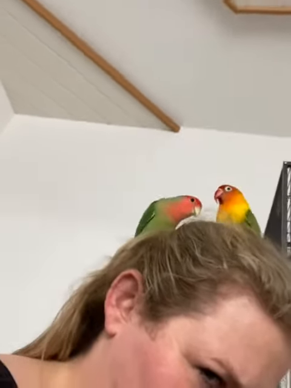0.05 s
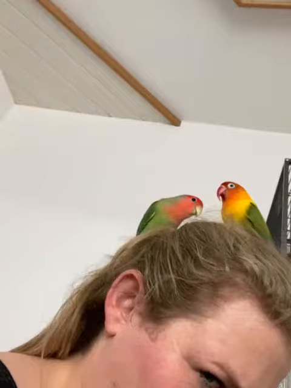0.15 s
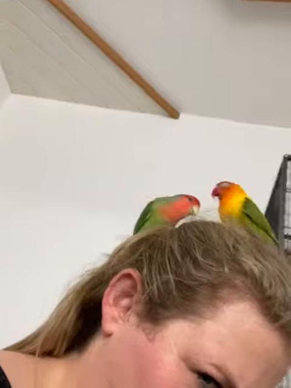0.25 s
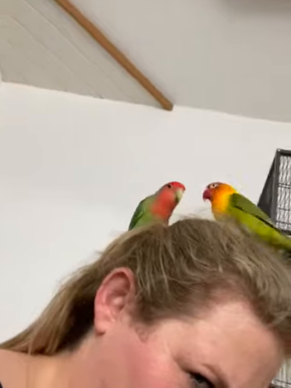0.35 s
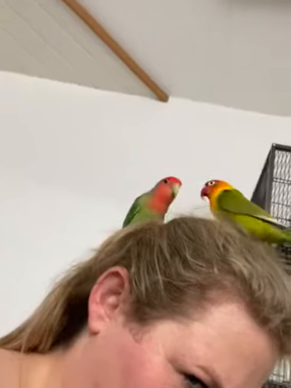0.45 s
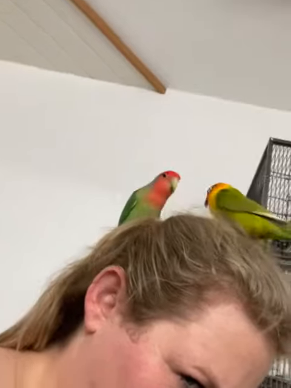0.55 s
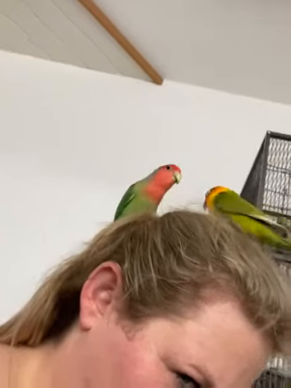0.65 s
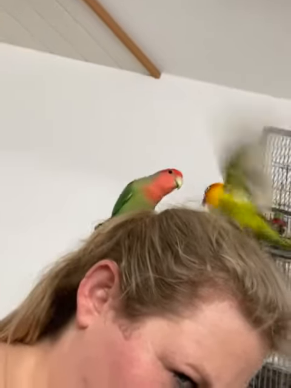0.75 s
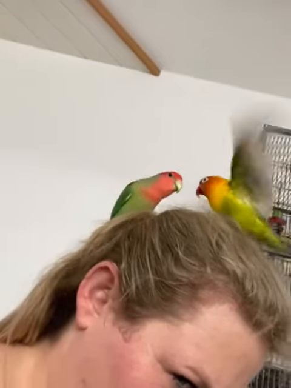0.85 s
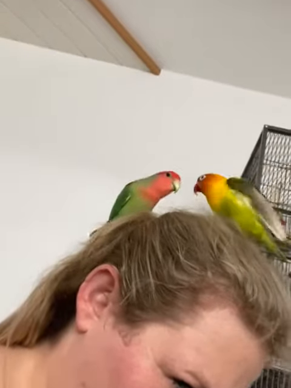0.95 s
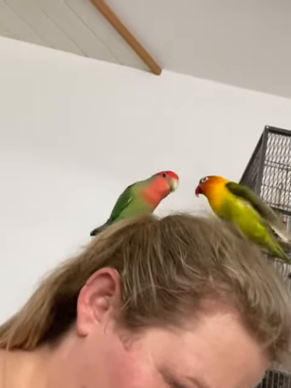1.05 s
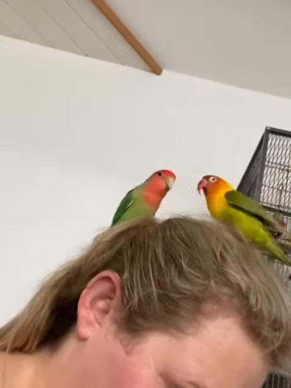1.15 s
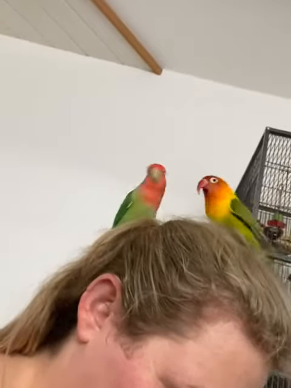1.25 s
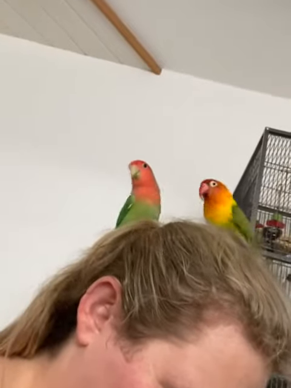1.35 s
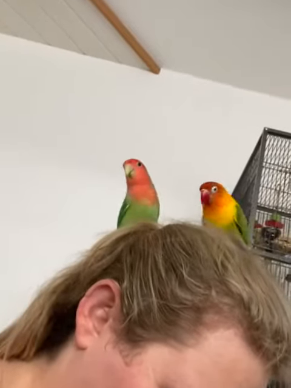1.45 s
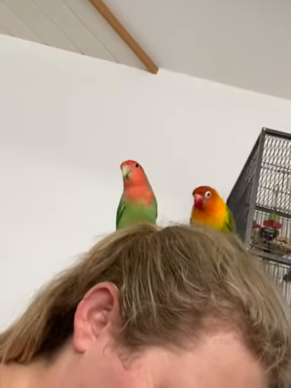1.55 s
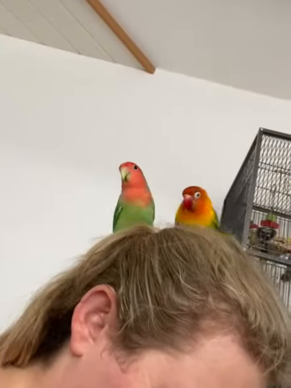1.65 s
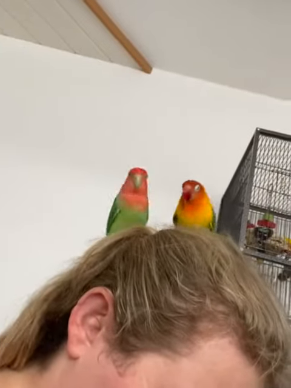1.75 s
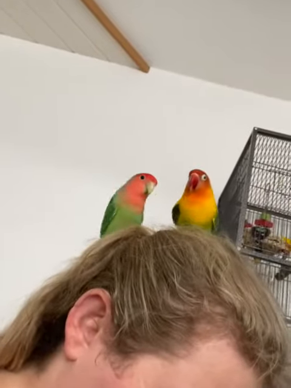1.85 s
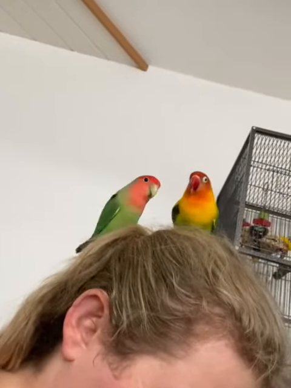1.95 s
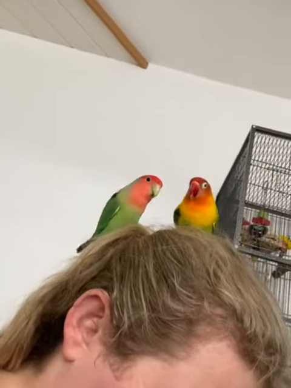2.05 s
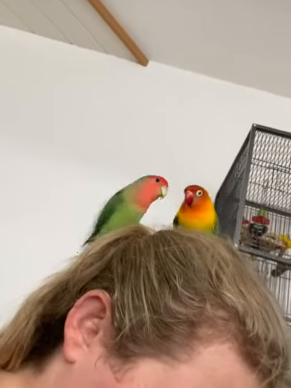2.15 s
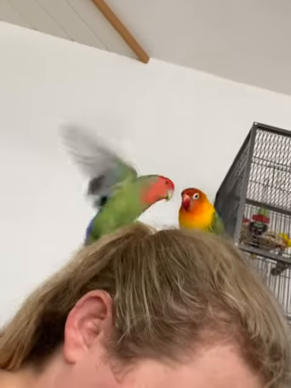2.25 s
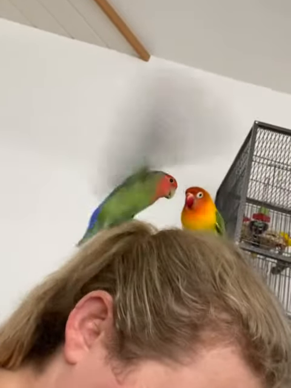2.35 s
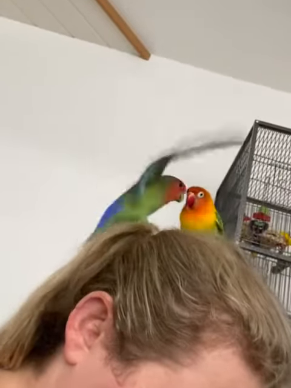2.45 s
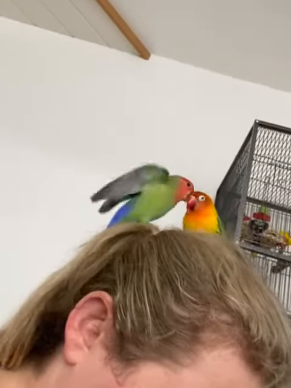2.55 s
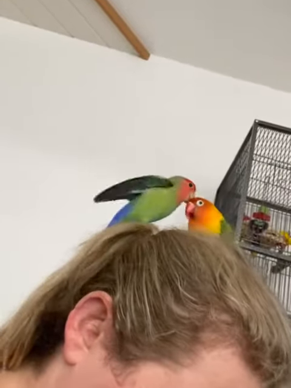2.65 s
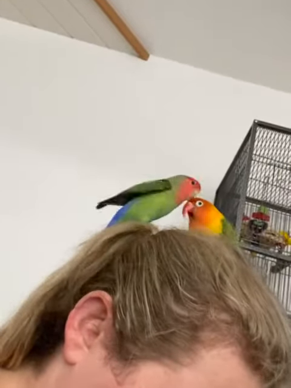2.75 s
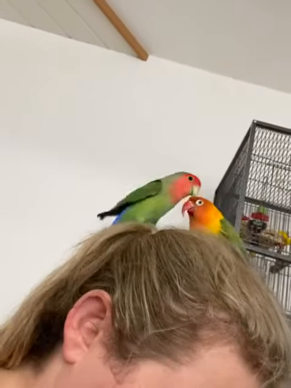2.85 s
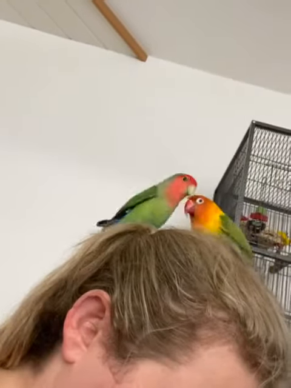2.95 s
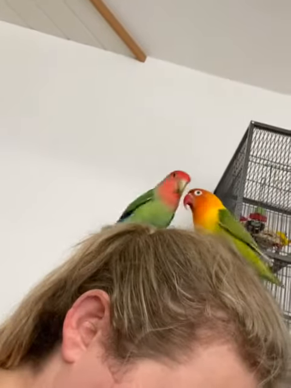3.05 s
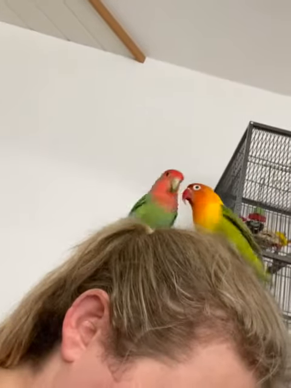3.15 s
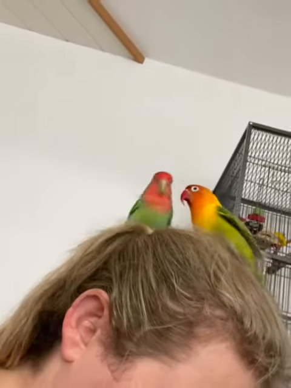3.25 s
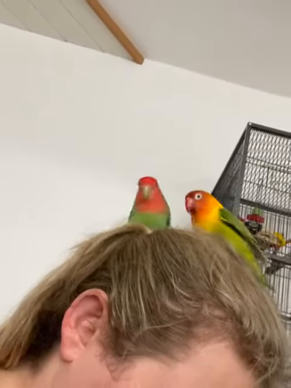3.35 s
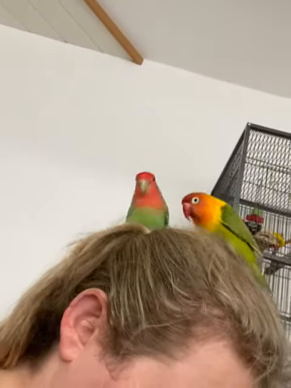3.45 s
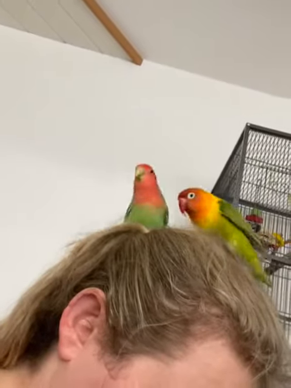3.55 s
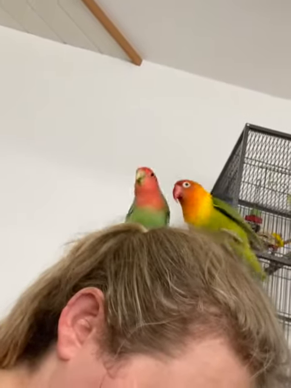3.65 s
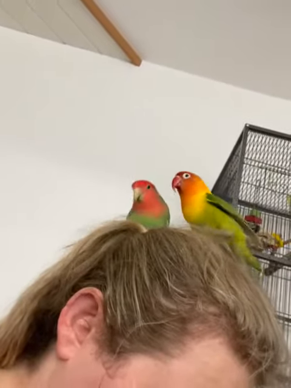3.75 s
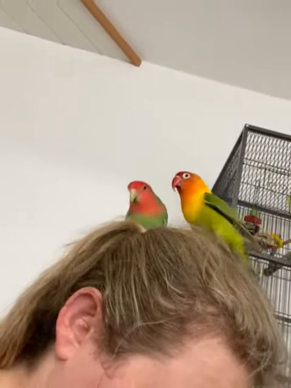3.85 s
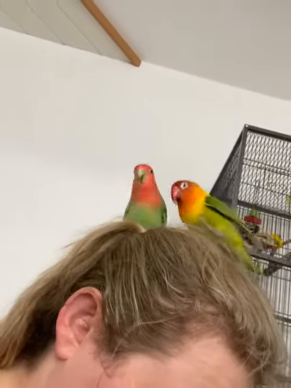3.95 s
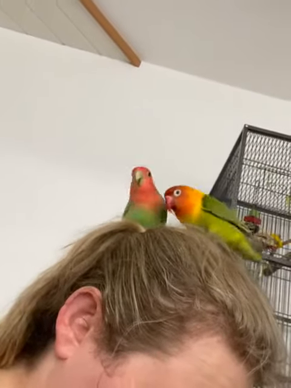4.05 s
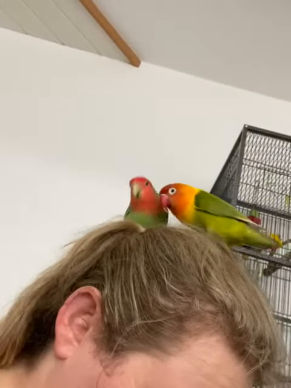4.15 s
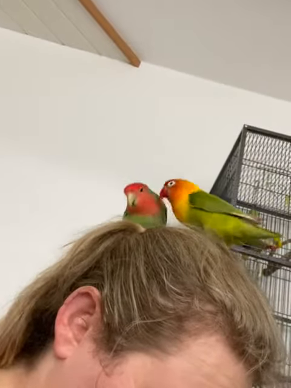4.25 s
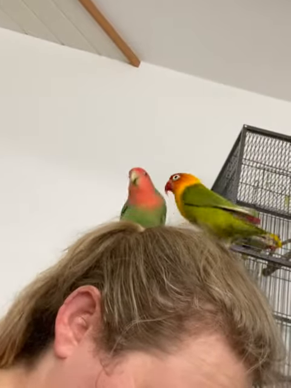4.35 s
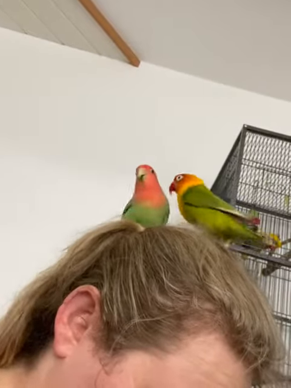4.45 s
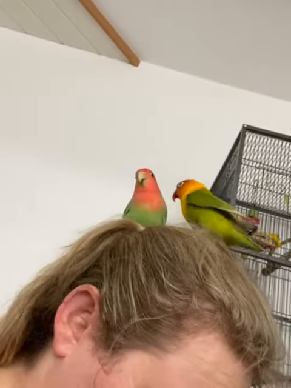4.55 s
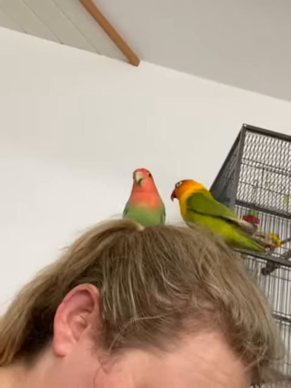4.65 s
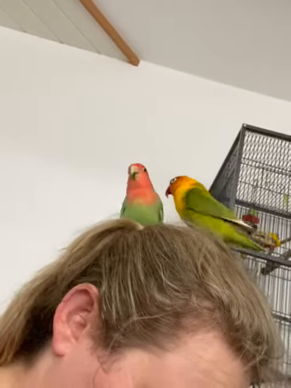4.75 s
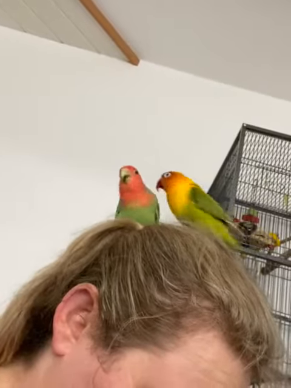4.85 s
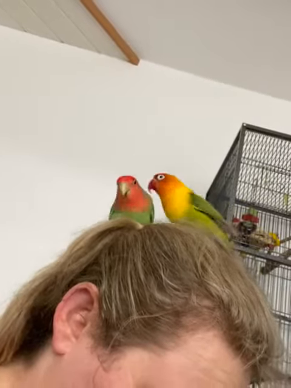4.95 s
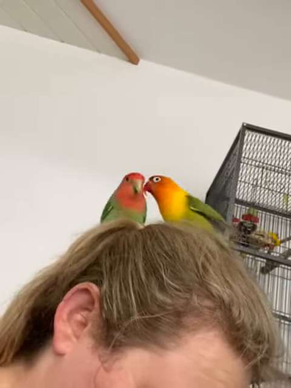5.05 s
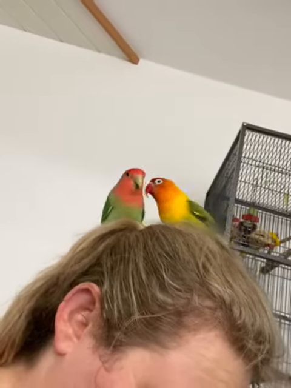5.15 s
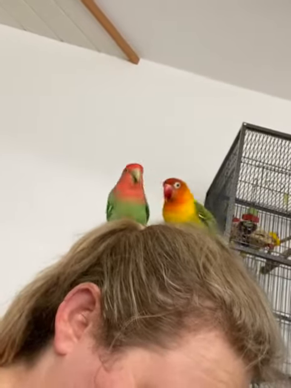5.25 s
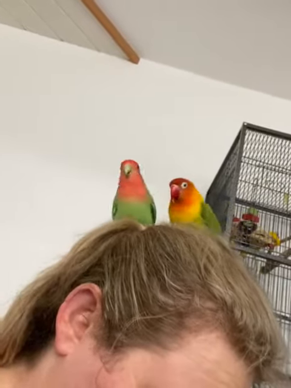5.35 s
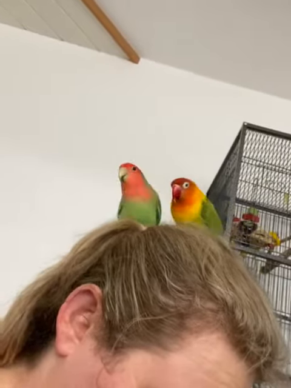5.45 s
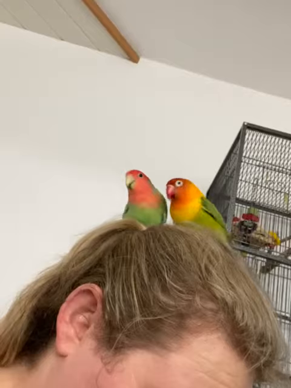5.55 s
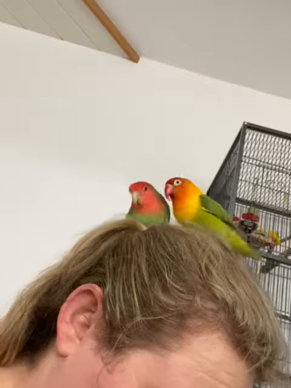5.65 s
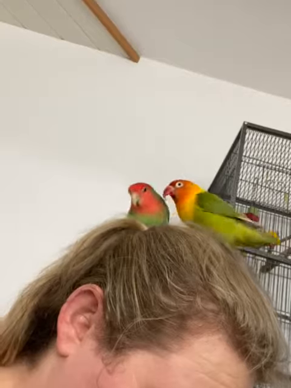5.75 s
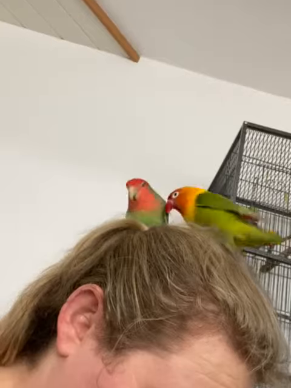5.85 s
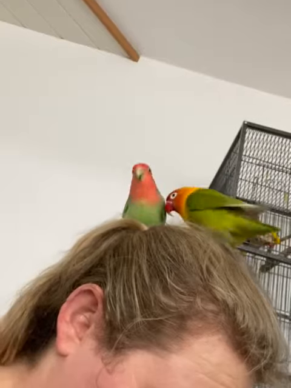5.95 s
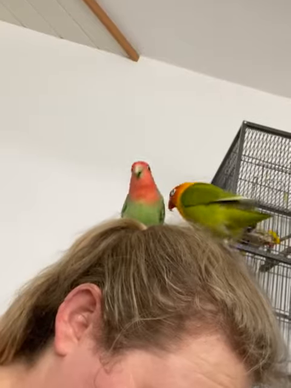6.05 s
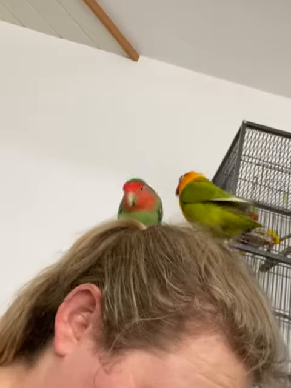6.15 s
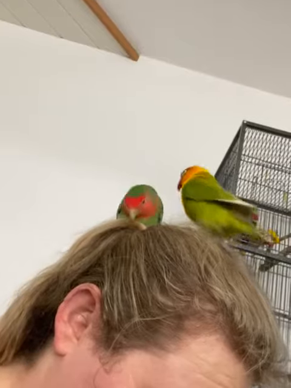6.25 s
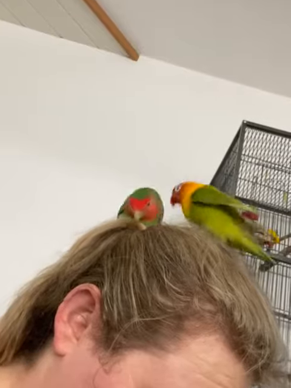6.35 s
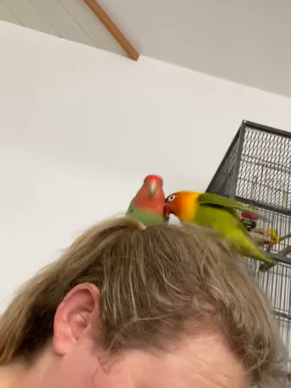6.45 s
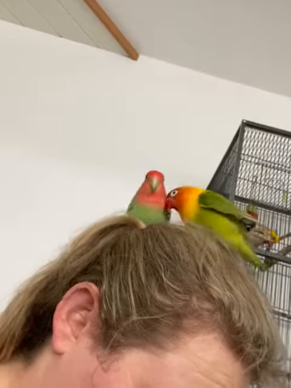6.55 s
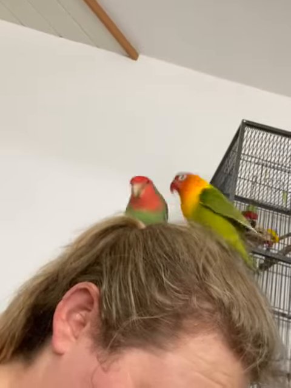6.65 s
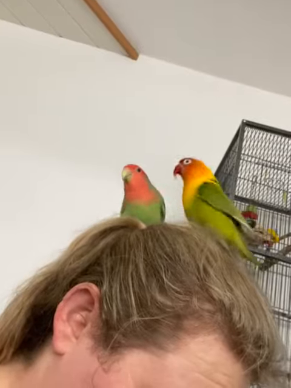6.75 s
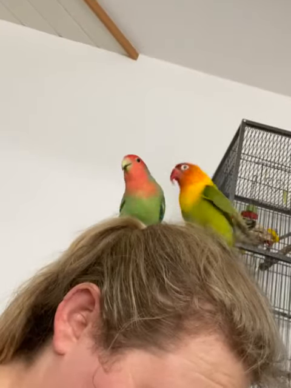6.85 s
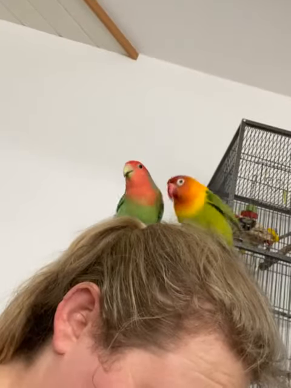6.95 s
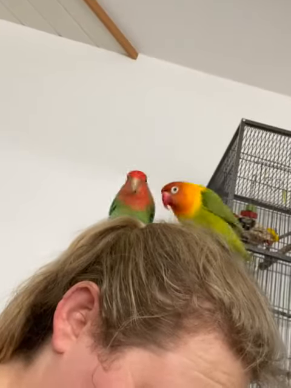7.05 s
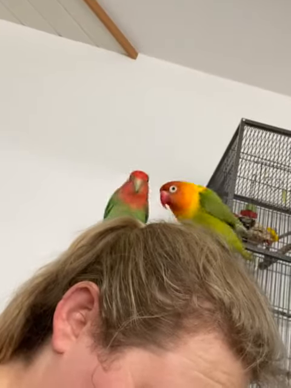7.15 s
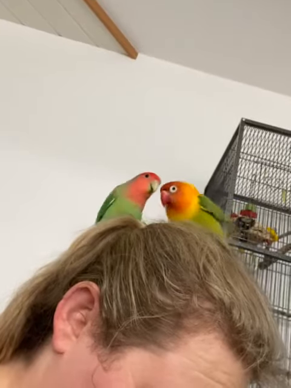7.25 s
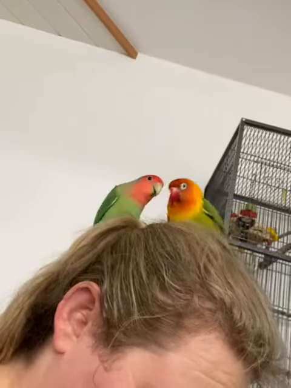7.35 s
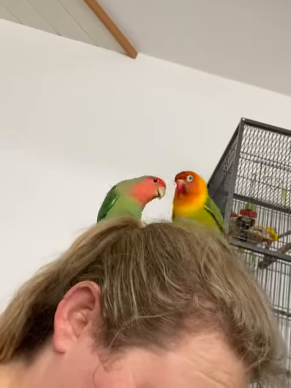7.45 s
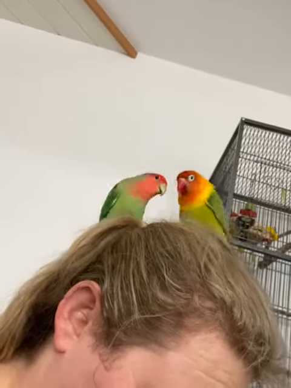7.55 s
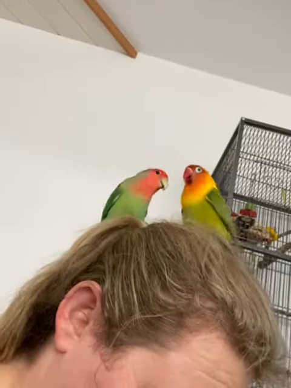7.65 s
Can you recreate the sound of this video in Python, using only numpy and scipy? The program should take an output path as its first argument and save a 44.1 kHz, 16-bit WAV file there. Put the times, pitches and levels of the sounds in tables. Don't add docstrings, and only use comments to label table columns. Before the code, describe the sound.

Sharp, split-second lovebird chirps ring off bare walls, separated by quiet dry beak ticks, a brief feathery flap and faint appliance hum.

```python
import sys
import numpy as np
from scipy import signal
from scipy.fft import rfft, irfft
from scipy.io import wavfile
from scipy.ndimage import uniform_filter1d

SR = 44100
rng = np.random.default_rng(int(sys.argv[2]) if len(sys.argv) > 2 else 0)


def dump(signal):
    limited = np.clip(np.atleast_2d(signal).T, -1, 1)
    pcm = np.round(limited * 32767).astype(np.int16)
    wavfile.write(sys.argv[1], SR, pcm)


def voltage_ratio(level):
    return 10 ** (np.asarray(level, float) / 20)


N = 339109

# time in seconds, pitch in Hz, effort in dB, beak resonance in dB.
HELD_NOTES = [
    [(.9272, 2220, -11, 1), (.9328, 2170, -11, 1), (.9368, 2250, -4, -1), (.941, 2130, -1, 0),
     (.9445, 2160, 0, 2), (.9464, 2190, -2, 3), (.9494, 2290, -6, 7), (.9566, 2410, -8, 10),
     (.9592, 2300, -8, 0)],
    [(2.4279, 2480, 1, 0), (2.4325, 2530, 1, -1), (2.435, 2390, -5, -3), (2.4445, 2360, -3, -6),
     (2.447, 2490, -3, -2), (2.46, 2470, -3, -3), (2.4625, 2290, -4, 3), (2.4688, 2620, -4, 4)],
]
# time in seconds, soft lead-in in ms, length in ms, pitch in Hz, effort in dB.
PIPS = [
    (.9148, .1, 1.8, 2220, -8),
    (.9205, .1, 2.2, 2200, -24),
    (.9247, .1, 1.2, 2250, -19),
    (2.4217, .8, 1.3, 2400, -6),
    (5.4446, 1.1, 1.7, 2390, -12),
]
# time of the top in seconds, jump in Hz, fall in ms, effort surge in dB.
FLICKS = [
    (.9288, 420, 2, 11),
    (.939, 350, 1.7, 5),
    (2.4364, 420, 2.4, 7),
    (2.446, 380, 1.7, 4),
    (2.4521, 1050, 1.4, 7.5),
]
# time in seconds, length in ms, drop in Hz, sag in Hz per ms.
REGISTER_SLIP = (2.4566, 3.2, 300, 45)
# valid from in seconds, half steps in pitch jumps in dB, steady half steps in dB,
# hoarseness in dB, onset puff in dB, share sent to the room in dB.
CHIRP_CHARACTER = [
    (0, -32, -29.5, -37, -13.5, -1.5),
    (2, -21, -30.5, -22, -25, -1.1),
    (5, -42, -37, -49, -9, -4),
]
OVERTONE_PUSH = [.5, 1, 1, .85, 2.1]
# frequency in Hz, gain in dB.
WINDPIPE = [(1500, -62), (2060, -38), (2160, -18), (2700, -18), (3300, -15), (4400, -11), (5300, -6),
            (6400, -13), (7000, -11), (7600, -17), (8300, -30), (8900, -24), (10500, -29), (11200, -20),
            (12100, -34), (12700, -70)]
# frequency in Hz, density in dB per Hz.
PUFF_SPECTRUM = [(500, -27.5), (1200, -6), (3500, -3.5), (5500, -0.7), (8000, -9.5), (11000, -10),
                 (12500, -35.5)]

# knock in Hz, hollow note in dB.
DEEP_BEAK = (1240, -14)
MIDDLE_BEAK = (1580, -15)
THIN_BEAK = (1950, -22)
# time in seconds, peak in dB, snap in dB.
DEEP_TICKS = [(.0755, -44.5, -11.5), (.169, -45, -12), (.248, -40.5, -13), (.465, -39, -22.5),
              (.529, -42.5, -13.5), (.553, -41, -16), (.645, -40.5, -11.5), (.735, -44.5, -18.5),
              (1.637, -38.5, -19), (1.833, -37.5, -16.5), (1.994, -55.5, -2), (2.135, -42, -20),
              (3.71, -48.5, -27), (3.816, -38, -20), (4.519, -45, -32), (7.14, -42, -6), (7.23, -39.5, -15)]
THIN_TICKS = [(.374, -45.5, -6), (.9025, -36, -16), (1.541, -40.5, -25), (5.559, -61, -8.5),
              (6.427, -51.5, -15), (6.92, -59.5, -4), (7.268, -57, -2), (3.2135, -51, -3)]
LOOSE_TICKS = [(.072, -42.5, -28), (.181, -43.5, -1.5), (.26, -37, -18), (.635, -46, -10),
               (.825, -47.5, -30), (1.2565, -53, -10.5), (1.371, -39.5, -10), (1.485, -45, -25),
               (1.611, -40, -8.5), (1.735, -38, -15), (1.875, -41, -13.5), (2.255, -40.5, -16.5),
               (6.064, -50, -21.5), (6.184, -45, -38), (6.299, -41, -24), (6.537, -52.5, -17),
               (7.028, -40.5, -17), (7.114, -39.5, -12), (7.328, -44.5, -9.5)]
GRINDING_TICKS = [(2.705, -47.5, -14), (2.861, -44.5, -7), (2.977, -48.5, -20), (3.095, -42, -19.5),
                  (3.208, -47, -5.5), (3.332, -44, -9), (3.453, -41, -16), (3.559, -43.5, -10),
                  (3.679, -38.5, -11), (3.79, -47, -11), (3.914, -43.5, -15), (4.034, -39.5, -15),
                  (4.128, -38.5, -15), (4.149, -42.5, -7.5), (4.262, -45, -24.5), (4.38, -49, -10),
                  (4.552, -39, -13), (4.644, -37, -23), (4.735, -43.5, -14), (5.124, -50, -15),
                  (5.246, -47, -12), (5.354, -41, -16), (5.463, -39.5, -19), (5.583, -44, -20)]

# start in seconds, length in seconds, level in dB, brightness in dB per octave.
WING_STROKES = [
    (0.784, 0.064, -62.5, 2),
    (0.878, 0.051, -61, 1),
    (2.246, 0.056, -53.5, 2.5),
    (2.3388, .007, -47, -1),
    (2.343, 0.027, -47.5, -0.5),
    (5.826, .007, -72, 6),
    (1.996, 0.0071, -62.5, 4),
    (2.371, 0.032, -57, -3),
    (2.403, 0.021, -44, -0.5),
]
# frequency in Hz, density in dB per Hz.
FEATHER_SPECTRUM = [(88, -32), (150, -2.5), (664, -2.5), (1650, -6), (2680, -4.5), (3280, -7), (7720, -8),
                    (11400, -15.5), (12800, -44.5), (16600, -71), (22000, -120)]
# start in seconds, length in seconds, level in dB, centre in Hz.
SCRATCHES = [
    (7.3, .03, -72, 7200),
    (7.385, .025, -70, 5500),
    (7.435, .045, -71, 3500),
    (7.54, .07, -70, 2900),
    (.01, .065, -71, 2900),
]
# time of the top in seconds, half width in seconds, level in dB, air frequency factor.
WING_BEATS = [
    (0.469, 0.041, -67, 1.64),
    (0.584, 0.051, -61, 1.5),
    (0.702, 0.044, -67.5, 2.1),
    (2.305, .022, -54, 0.44),
    (2.385, 0.032, -52, .72),
    (2.465, 0.037, -55, .72),
]
# frequency in Hz, density in dB per Hz.
AIR_SPECTRUM = [(30, -18.5), (55, 0.6), (90, 6), (150, 1.5), (300, -13), (600, -30)]

# delay in ms, level in dB.
WALL_ECHOES = [(3.1, -27), (8.2, -16.5), (10.1, -20.5), (13.2, -16.5), (16.5, -24), (20.5, -20),
               (24.5, -19.5)]
# frequency in Hz, time to fall 60 dB in seconds.
WALL_DECAY = [(300, 0.43), (1500, 0.48), (2500, 0.6), (5000, 0.53), (8000, 0.52), (11000, .38)]
# frequency in Hz, density in dB per Hz.
HUM_SPECTRUM = [(15, -54), (25, -25.5), (48, -4.5), (207, -5.5), (255, -8), (283, -7.5), (557, -12.5),
                (915, -13), (1160, -17.5), (1430, -19.5), (2220, -21), (2740, -21.5), (7970, -24),
                (11500, -32.5), (12800, -50), (16600, -80), (22000, -120)]
# centre in Hz, width in Hz, level in dB.
PIPE_DRONE = (890, 110, -82)


def evened(x):
    return x / np.sqrt(np.mean(x ** 2) + 1e-20)


def read(points, hz):
    f, value = np.transpose(points)
    return np.interp(np.log(hz + 1), np.log(f + 1), value)


def add(mix, start_s, sound):
    part = mix[round(start_s * SR):][:len(sound)]
    part += sound[:len(part)]


def coloured(size, points, tilt_db=0):
    hz = np.fft.rfftfreq(size, 1 / SR)
    inside = (hz > .5 * points[0][0]) & (hz < points[-1][0])
    gain = voltage_ratio(read(points, hz) + tilt_db * np.log2((hz + 1) / 3000)) * inside
    return evened(irfft(rfft(rng.standard_normal(size)) * gain, size))


def chirp(curve, half_db, steady_db, breath_db, puff_db):
    edge_ms, ring_ms, jitter = .75, .6, .006
    start_s, end_s = curve[0][0], curve[-1][0]
    t = np.arange(start_s - .002, end_s + .015, 1 / SR)
    smooth = max(round(edge_ms * SR / 1000), 1)
    keep = np.exp(-1000 / SR / ring_ms)

    hz, effort_db, beak_db = controls(curve, t)
    hz = uniform_filter1d(hz, size=12)
    wander = evened(uniform_filter1d(rng.standard_normal(len(t)), size=30))
    hz = hz * (1 + jitter * wander)
    turns = np.cumsum(hz) / SR

    voice = voltage_ratio(breath_db) * coloured(len(t), WINDPIPE) * voltage_ratio(effort_db)
    beak_db = uniform_filter1d(beak_db, smooth)
    for k in range(1, 6):
        push_db = effort_db * OVERTONE_PUSH[k - 1]
        push = uniform_filter1d(voltage_ratio(push_db), smooth)
        resonance_db = beak_db * np.exp(-((k * hz - 7100) / 1100) ** 2)
        throat = voltage_ratio(read(WINDPIPE, k * hz) + resonance_db)
        voice += push * throat * np.sin(2 * np.pi * k * turns)

    sounding = ((t >= start_s) & (t < end_s)) * 1.
    gate = signal.lfilter([1 - keep], [1, -keep], uniform_filter1d(sounding, smooth // 2))
    opening = np.maximum(np.gradient(gate), 0)
    setting_in = signal.lfilter([1], [1, -.965], opening)
    jumps = np.minimum(abs(np.gradient(hz)) / 5, 6)
    uneven = voltage_ratio(steady_db) + voltage_ratio(half_db) * jumps + 0.72 * setting_in
    voice *= 1 + np.minimum(uneven, .9) * np.cos(np.pi * turns)

    puff = voltage_ratio(puff_db + effort_db) * opening * 20 * coloured(len(t), PUFF_SPECTRUM)
    voice = voice * gate ** .7
    high_pass = signal.butter(8, .86 * curve[0][1], "high", fs=SR, output="sos")
    above = signal.sosfilt(high_pass, voice)
    return t[0], signal.lfilter(*signal.iirnotch(8400, 16, SR), above + puff)


def controls(curve, t):
    rise_ms, surge_lag_ms, surge_ms = 1.35, .7, 1.7
    slip_s, slip_ms, drop_hz, sag_hz_per_ms = REGISTER_SLIP
    slip_effort_db, slip_beak_db = 3, -11.5
    s, *columns = np.transpose(curve)
    hz, effort_db, beak_db = (np.interp(t, s, c) for c in columns)
    for top_s, jump_hz, fall_ms, surge_db in FLICKS:
        ms = 1000 * (t - top_s)
        rise, fall = np.maximum(1 + ms / rise_ms, 0), np.exp(-abs(ms) / fall_ms)
        hz = hz + jump_hz * np.where(ms < 0, rise, fall)
        effort_db = effort_db + surge_db * np.exp(-((ms - surge_lag_ms) / surge_ms) ** 2)
    ms = 1000 * (t - slip_s)
    low = (ms > 0) & (ms < slip_ms)
    hz = hz - low * (drop_hz + sag_hz_per_ms * ms)
    return hz, effort_db + low * slip_effort_db, beak_db + low * slip_beak_db


def pip(s, lead_ms, length_ms, hz, effort_db):
    lead_db, sag_hz_per_ms, beak_db = effort_db - 14, 35, -2.5
    return [(s - lead_ms / 1000, hz, lead_db, beak_db),
            (s - 1 / SR, hz, lead_db, beak_db),
            (s, hz, effort_db, beak_db),
            (s + length_ms / 1000, hz - sag_hz_per_ms * length_ms, effort_db, beak_db)]


def tick(row, voicing, chance):
    snap_hz, hollow_hz, knock_spread, hollow_spread_db = 4200, 480, 0.11, 4.5
    s, peak_db, snap_db = row
    knock_hz = voicing[0] * (1 + knock_spread * (chance[5] - .5))
    hollow_db = voicing[1] + hollow_spread_db * (chance[6] - .5)
    t = np.arange(500) / SR

    from_snap = t - .0002
    snap_s = .0001 + .00012 * chance[1]
    snap = np.sin(2 * np.pi * snap_hz * (.8 + .55 * chance[0]) * from_snap) * np.exp(-(from_snap / snap_s) ** 2)

    late = np.maximum(t - .00018, 0)
    knock_decay = voltage_ratio(-60 * late / (.004 + .0025 * chance[1]))
    knock = np.sin(2 * np.pi * knock_hz * late + 2.6) * np.tanh(late / .00005) * knock_decay
    skull = np.sin(2 * np.pi * 970 * late) * voltage_ratio(-60 * late / .015)
    knock += .2 * skull * chance[4]

    turns = hollow_hz * (.8 + .25 * chance[2]) * (late + .0018 * (1 - np.exp(-late / .0005)))
    hollow_decay = voltage_ratio(-60 * late / (.006 + .004 * chance[3]))
    hollow = -np.sin(2 * np.pi * turns) * hollow_decay * (1 - np.exp(-late / .0003))

    sound = voltage_ratio(snap_db + 9.5) * snap + voltage_ratio(-2.5) * knock + voltage_ratio(hollow_db + 12) * hollow
    return s + .0009, voltage_ratio(peak_db) * signal.lfilter(*signal.butter(2, 7500, fs=SR), sound)


def stroke(s, length_s, db, tilt_db):
    grain_db = 4
    swish = coloured(8192, FEATHER_SPECTRUM, tilt_db)
    grain = voltage_ratio(grain_db * evened(uniform_filter1d(rng.standard_normal(8192), 120)))
    size = min(round(length_s * SR), 8192)
    return s, voltage_ratio(db) * evened(swish * grain)[:size] * signal.windows.tukey(size, .5)


def scratch(s, length_s, db, hz):
    band = coloured(4096, [(.6 * hz, -24), (.85 * hz, -3), (1.15 * hz, -3), (1.6 * hz, -24)])
    size = min(round(length_s * SR), 4096)
    return s, voltage_ratio(db) * band[:size] * np.hanning(size)


def gust(s, half_s, db, factor):
    t = np.arange(-3 * half_s, 3 * half_s, 1 / SR)
    air = coloured(SR, [(factor * hz, v) for hz, v in AIR_SPECTRUM])[:len(t)]
    return s + t[0], voltage_ratio(db) * air * np.exp(-.5 * (t / half_s) ** 2)


def room(x):
    tail_db, onset_s = -8, 0.011
    taps = np.zeros(SR)
    at = np.arange(300, SR - 10, 10) + rng.integers(0, 10, (SR - 301) // 10)
    taps[at] = rng.choice([-1., 1.], len(at))
    onset = 1 - np.exp(-np.arange(SR) / SR / onset_s)
    hz, t, z = signal.stft(taps * onset, SR, nperseg=256)
    decay = voltage_ratio(-60 * t / read(WALL_DECAY, hz)[:, None])
    tail = signal.istft(z * decay, SR, nperseg=256)[1]
    tail = voltage_ratio(tail_db) * tail / np.linalg.norm(tail)
    for ms, db in WALL_ECHOES:
        add(tail, ms / 1000, voltage_ratio(db) * np.ones(1))
    return signal.fftconvolve(x, tail)[:N]


def slow_drift(size):
    once = uniform_filter1d(rng.standard_normal(N), size=size)
    return evened(uniform_filter1d(once, size=size))


def hum():
    hum_db, swell_db, lump_db = -66.5, -0.57, 1.5
    swell, lumps = slow_drift(9000), slow_drift(3000)
    hz, width, drone_db = PIPE_DRONE
    drone = coloured(N, [(hz - 3 * width, -50), (hz - width / 2, -3), (hz, 0),
                         (hz + width / 2, -3), (hz + 3 * width, -50)])
    high_pass = signal.butter(4, 52, "high", fs=SR, output="sos")
    wide = signal.sosfilt(high_pass, voltage_ratio(hum_db) * coloured(N, HUM_SPECTRUM))
    bass = signal.sosfiltfilt(signal.butter(1, 170, fs=SR, output="sos"), wide)
    steady = wide - bass + voltage_ratio(drone_db) * drone
    return voltage_ratio(swell_db * swell) * steady + voltage_ratio(lump_db * lumps + 0.7) * bass


def scene():
    voices, thrown, beak, wings, air = np.zeros((5, N))
    for curve in HELD_NOTES + [pip(*row) for row in PIPS]:
        character = [row for row in CHIRP_CHARACTER if row[0] <= curve[0][0]][-1]
        _, *timbre, share_db = character
        s, voice = chirp(curve, *timbre)
        add(voices, s, voice)
        add(thrown, s, voltage_ratio(share_db) * voice)
    for rows, voicing in ((DEEP_TICKS, DEEP_BEAK), (THIN_TICKS, THIN_BEAK),
                          (LOOSE_TICKS, MIDDLE_BEAK), (GRINDING_TICKS, MIDDLE_BEAK)):
        for row, chance in zip(rows, rng.random((len(rows), 7))):
            add(beak, *tick(row, voicing, chance))
    for row in WING_STROKES:
        add(wings, *stroke(*row))
    for row in SCRATCHES:
        add(wings, *scratch(*row))
    for row in WING_BEATS:
        add(air, *gust(*row))
    near = voices + beak + wings
    reflected = room(thrown + voltage_ratio(-2.5) * beak + wings)
    return (near + reflected + air + hum())[None]


def top_cut(x):
    return signal.sosfilt(signal.butter(12, 12900, fs=SR, output="sos"), x)


def record(dry):
    cut = signal.sosfilt(signal.butter(4, 38, "high", fs=SR, output="sos"), dry)
    cut = signal.oaconvolve(cut, signal.firwin(255, 12600, fs=SR)[None], "same")
    return top_cut(cut)


dry = scene()
out = record(dry)
dump(out)
```